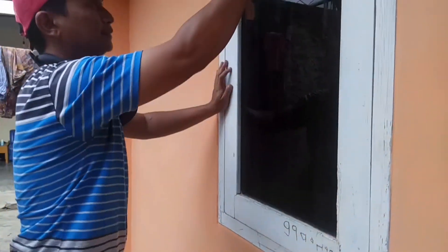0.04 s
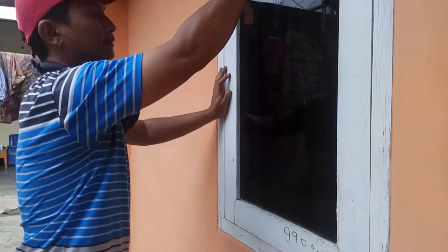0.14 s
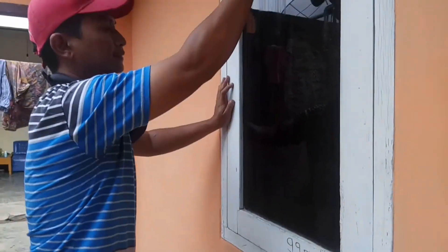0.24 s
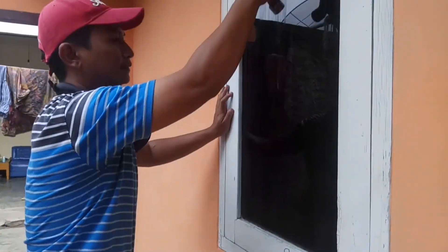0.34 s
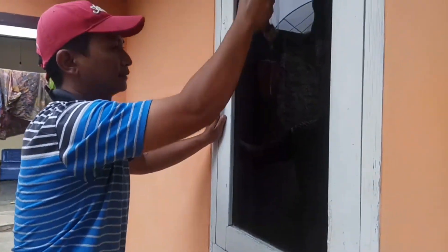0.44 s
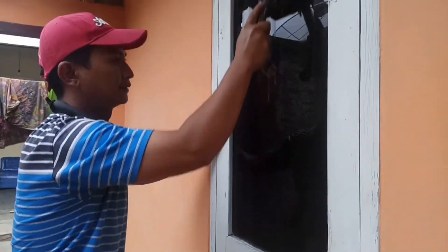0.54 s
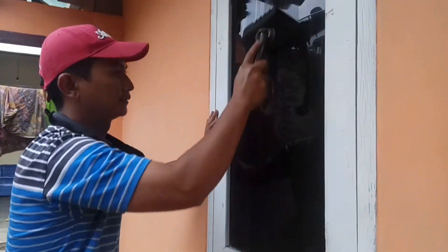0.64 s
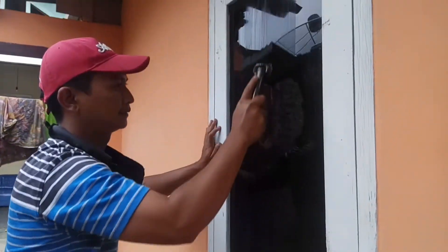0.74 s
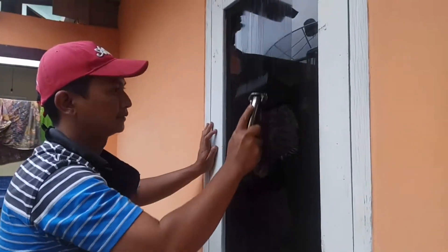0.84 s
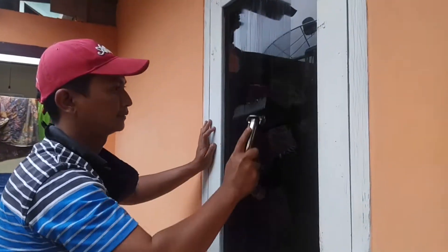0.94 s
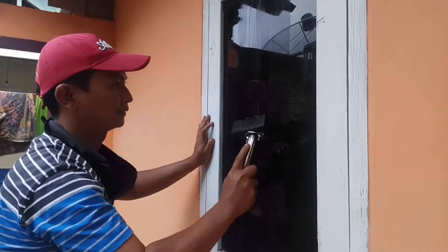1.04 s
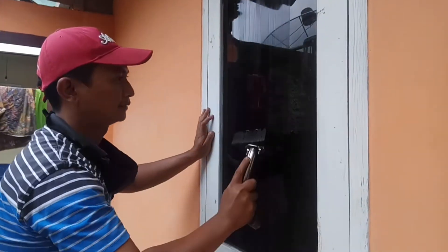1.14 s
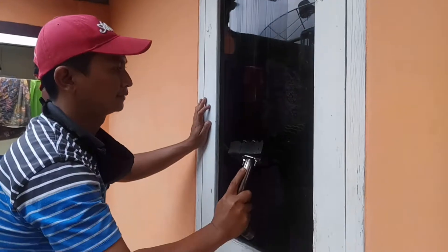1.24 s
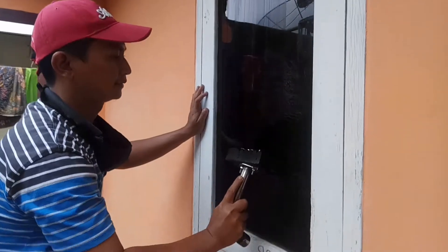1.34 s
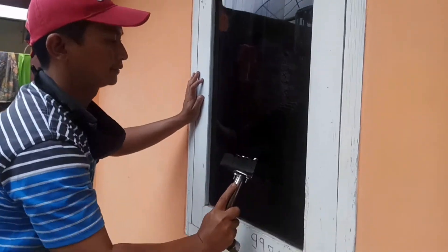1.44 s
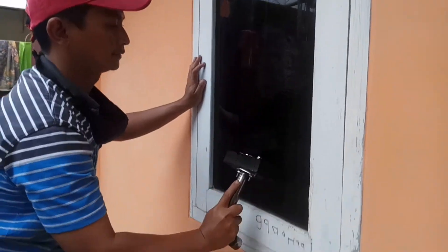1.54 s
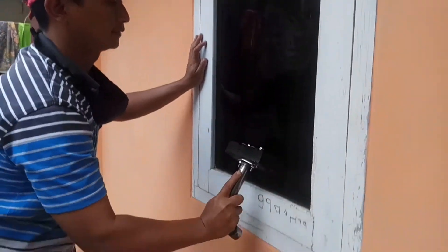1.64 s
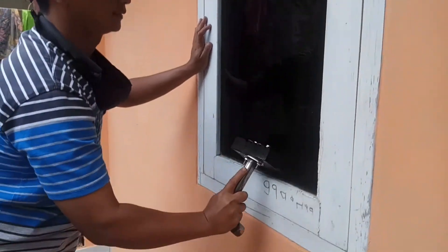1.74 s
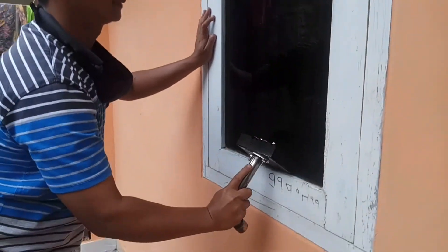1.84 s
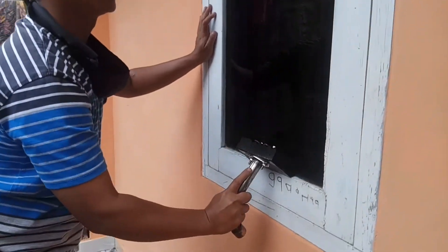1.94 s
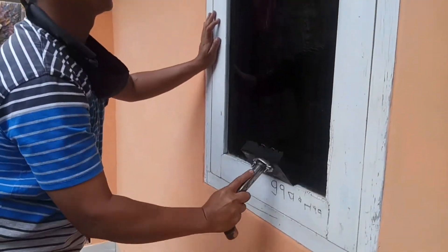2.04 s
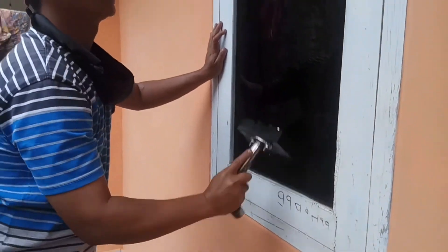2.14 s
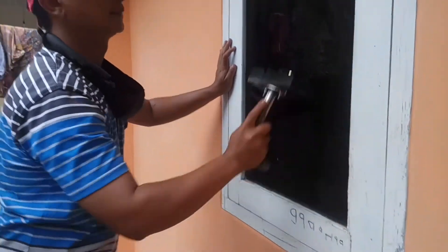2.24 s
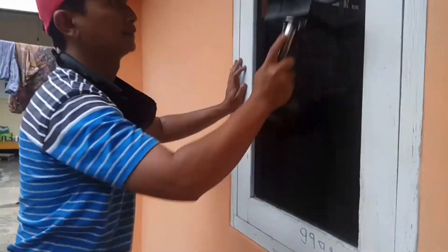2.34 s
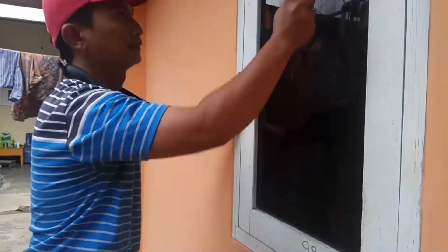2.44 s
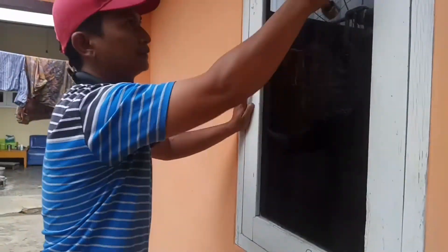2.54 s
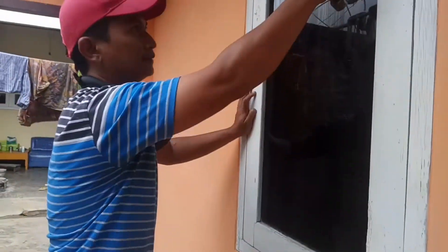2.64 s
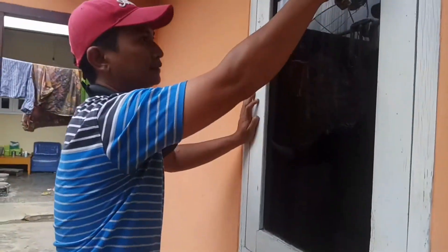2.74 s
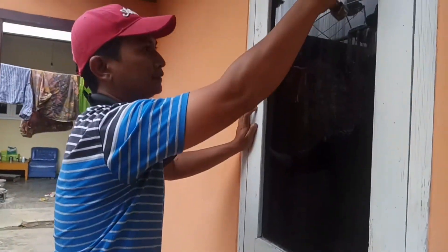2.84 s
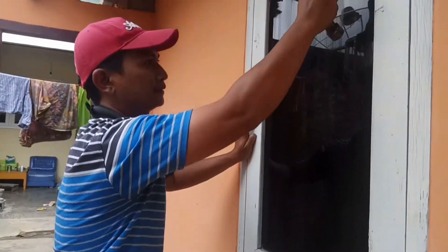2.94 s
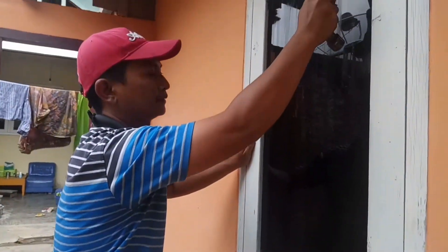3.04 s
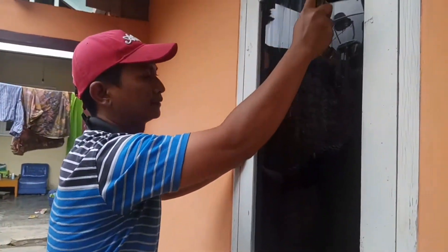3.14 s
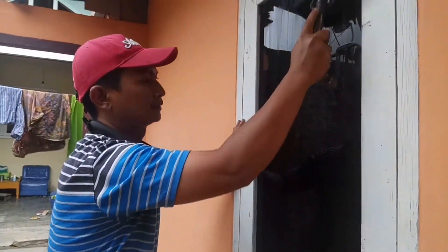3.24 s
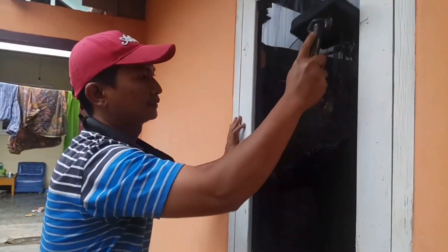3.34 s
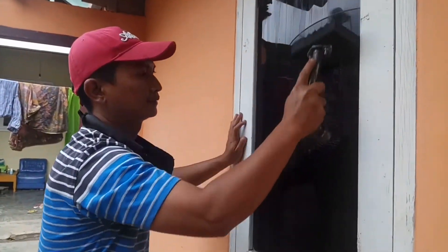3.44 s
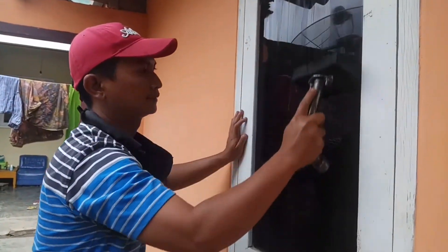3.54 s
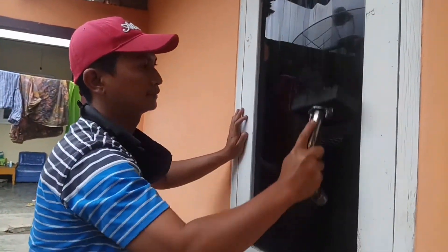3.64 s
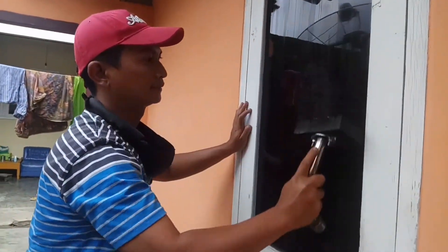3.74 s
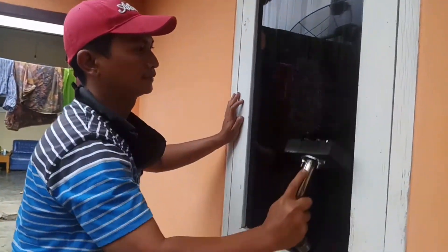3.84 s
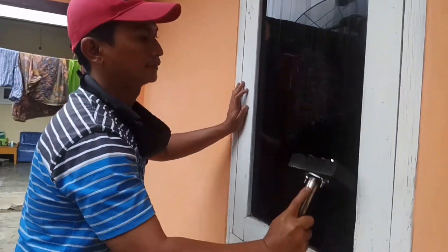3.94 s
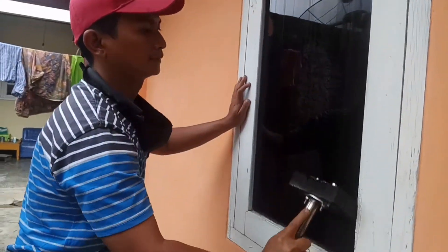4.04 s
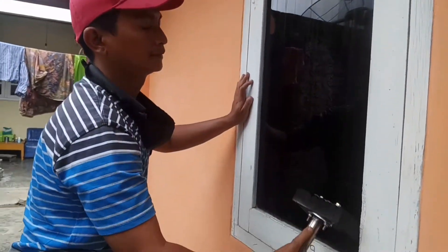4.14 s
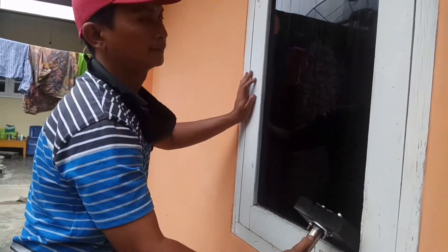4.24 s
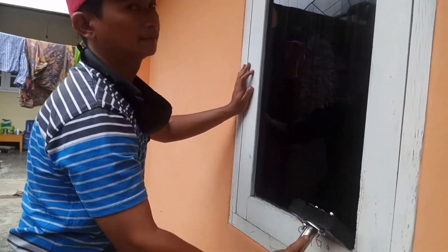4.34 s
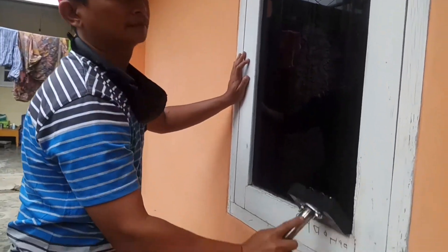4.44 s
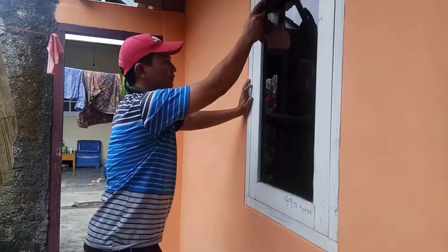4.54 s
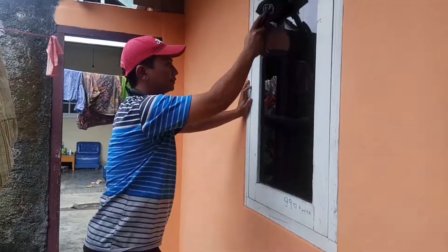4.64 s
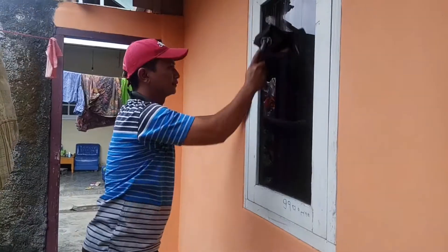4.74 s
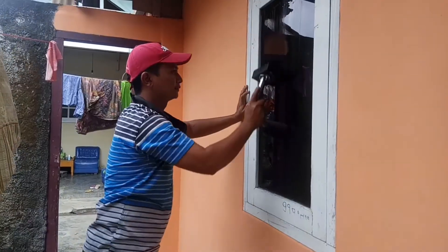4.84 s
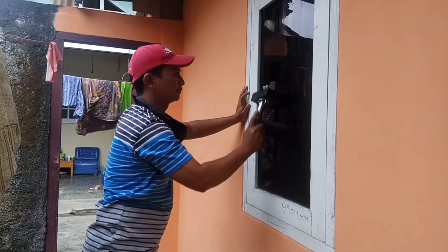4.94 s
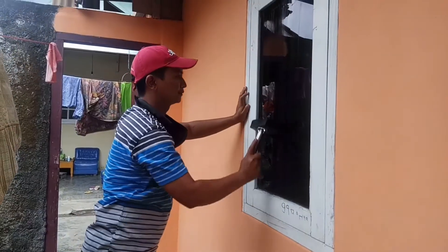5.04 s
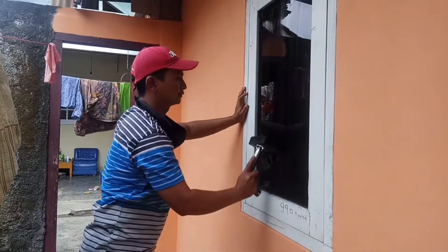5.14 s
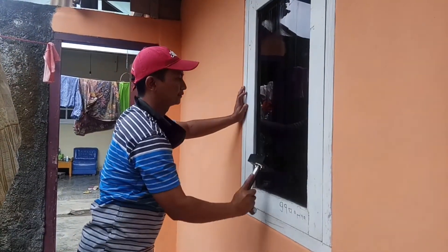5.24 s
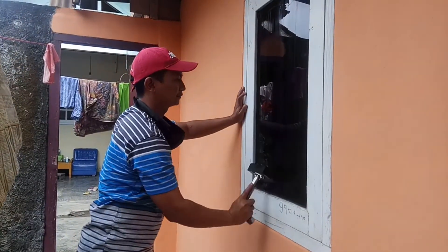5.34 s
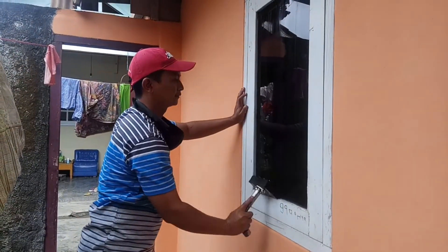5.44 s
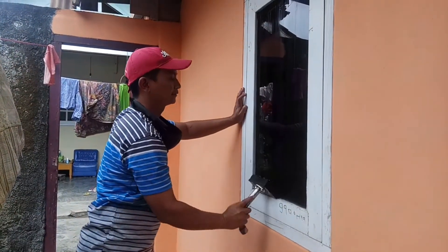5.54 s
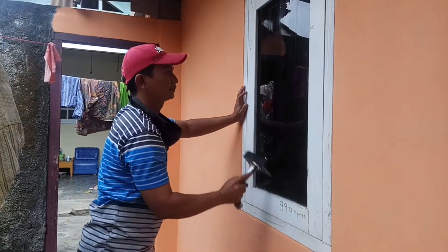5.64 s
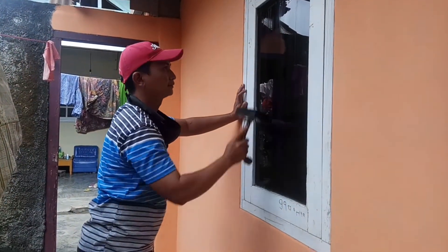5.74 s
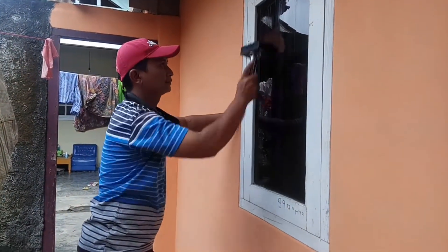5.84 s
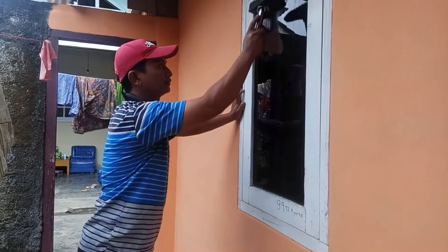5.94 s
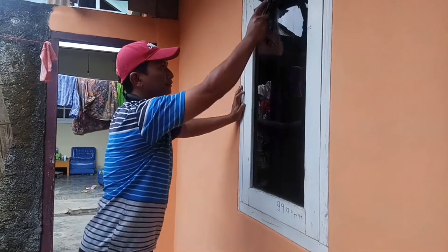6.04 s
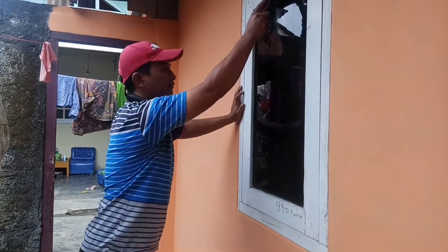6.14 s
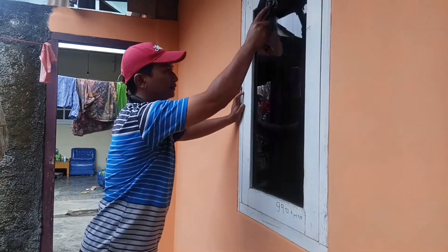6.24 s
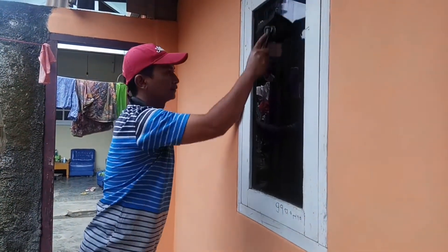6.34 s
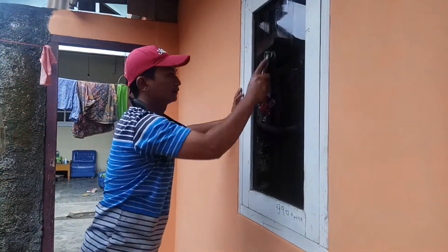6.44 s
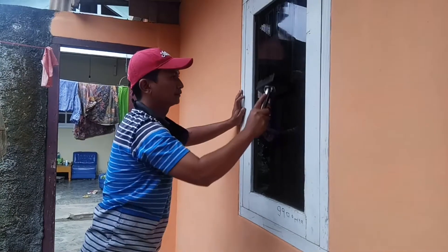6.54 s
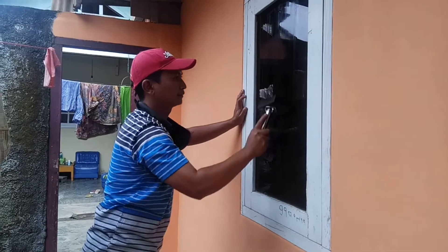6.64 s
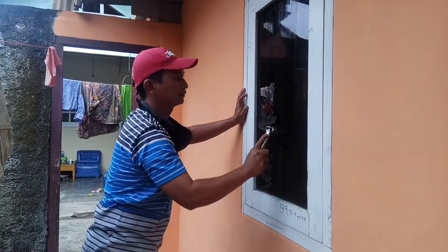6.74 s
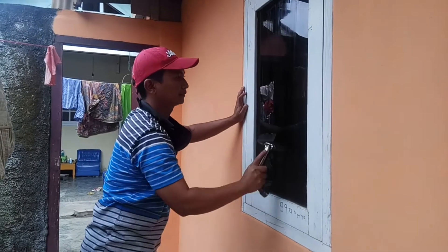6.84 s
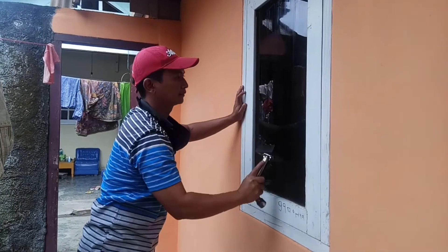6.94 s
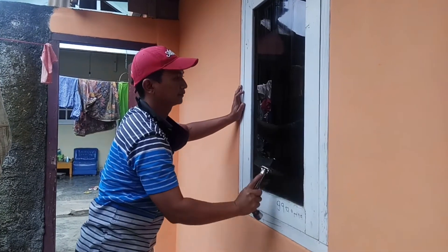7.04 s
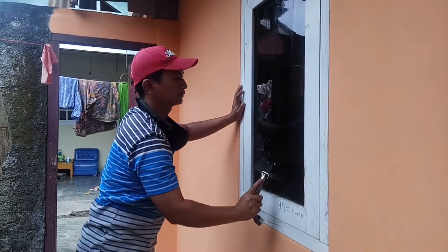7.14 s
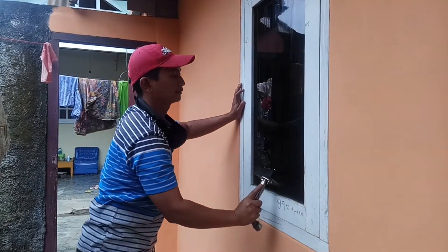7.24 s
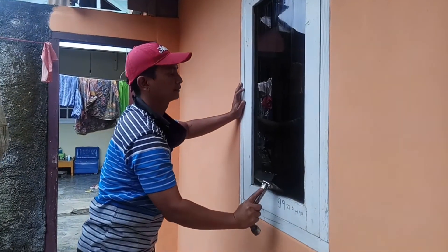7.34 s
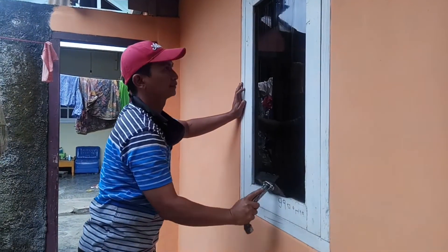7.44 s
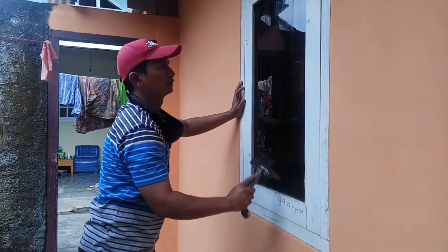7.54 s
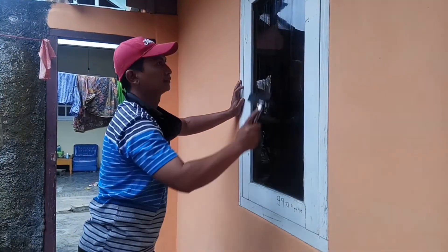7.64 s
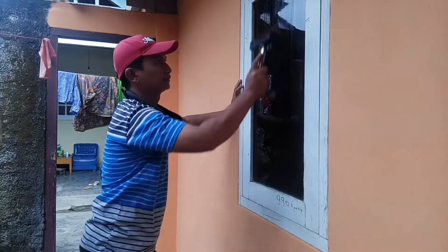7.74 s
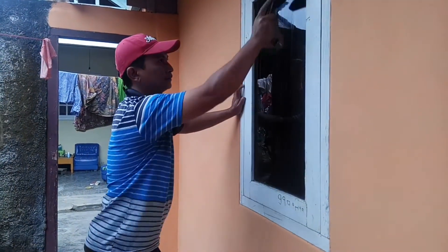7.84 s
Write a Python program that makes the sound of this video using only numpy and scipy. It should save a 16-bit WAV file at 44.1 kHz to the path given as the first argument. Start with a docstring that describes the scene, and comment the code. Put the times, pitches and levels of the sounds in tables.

```python
"""A rubber wiper is pulled four times down a window pane on a porch, close to a pair of microphones.
The blade hisses and scrapes (shaped noise); where it grips, it sticks and slips in a hooting squeak (a near
sine with overtones), its slips rasp and its edge squeals thinly. Around the pulls the tool dabs, ticks and
bumps the pane, clatters on the wooden frame (short noises, decaying tones) and makes both boom (low noise).
Farther off lie a low outdoor rumble, thin air and a faint trill; a gust of wind dies away at the start."""
import sys
import numpy as np
from scipy import signal
from scipy.fft import rfft, irfft
from scipy.io import wavfile

SR = 44100
rng = np.random.default_rng(int(sys.argv[2]) if len(sys.argv) > 2 else 0)


def inscribe(sig):
    """Save sig as 16-bit PCM at rate SR to the path in sys.argv[1].

    A 1-D sig is mono; a 2-D sig holds one channel per row.
    Samples are clipped to [-1, 1] before scaling.
    """
    pcm = np.round(np.clip(np.atleast_2d(sig).T, -1, 1) * 32767)
    wavfile.write(sys.argv[1], SR, pcm.astype(np.int16))


N = 347928
TIME = np.arange(N) / SR  # s

# All table levels are relative: the layers add their own gains.
# Likeness of the two microphones: (frequency [Hz], coherence)
MIC_COHERENCE = [(60, .85), (300, .8), (700, .82), (1400, .5), (3000, 0), (15000, 0)]
# Tilt of noise between the microphones: (frequency [Hz], left-right [dB])
MIC_BALANCE = [(60, -0.5), (700, -.5), (2400, 2.5), (4400, -3), (6500, -4.5), (7800, 3.5), (9000, 14.5),
               (12000, 18.5), (15000, 6)]

# Low swells, mostly around the ends of pulls: the pane and frame boom as the tool reaches them:
# (time [s], length [s], deep level [dB], low-middle level [dB])
PANE_AND_FRAME_BOOMS = [(0.55, 0.24, -46.5, -48), (1.0, 0.43, -57.5, -54.5), (2.02, 0.31, -40, -42),
                        (2.353, 1, -53, -81), (3.038, 0.58, -40.5, -52.5), (3.955, 0.27, -48, -48),
                        (4.277, 0.41, -43, -42), (4.524, 0.16, -40, -49), (5.242, 0.071, -69, -47),
                        (5.647, 0.47, -40.5, -49.5), (5.992, 0.23, -43.5, -55), (6.878, 0.28, -51.5, -45),
                        (7.114, 0.17, -43.5, -56), (7.612, 0.12, -66, -54), (7.89, 0.27, -50, -46.5)]
# Spectrum of the deep part of rumble and booms: (frequency [Hz], level [dB])
DEEP_SPECTRUM = [(12, -40), (20, -14.5), (32, -14), (53, -11.5), (74, -3.5), (91, 4), (153, -4), (178, -9),
                 (220, -19.5), (290, -52), (480, -120)]
# Spectrum of the low middle of rumble and booms: (frequency [Hz], level [dB])
LOW_MIDDLE_SPECTRUM = [(100, -18.5), (190, 1.5), (270, -2), (370, -2), (500, -12), (700, -22),
                       (1100, -25.5), (2500, -57.5)]
# Spectrum of the thin air outdoors: (frequency [Hz], level [dB])
AIR_SPECTRUM = [(700, -2.5), (1200, -14.5), (2000, -19), (2400, -8), (3200, -16), (5400, -14.5), (6400, -1),
                (7600, -22.5), (15000, -35.5)]
# A faint, far trill: (time [s], length [s], pitch [Hz], level [dB], left-right [dB])
FAR_TRILLS = [(0.1, .14, 4550, -67.5, -5), (6.05, 0.42, 2400, -69.5, 31), (7.77, 0.2, 2470, -59.5, 15)]

# Pulls down the pane: (start [s], end [s], rise [s], hiss level [dB], hiss sag [dB/s], scrape level [dB])
PULLS = [(0.36, 1.86, 0.076, -51, 7, -57.5), (3.07, 4.283, 0.19, -46, 6, -53.5),
         (4.68, 5.63, 0.2, -42.5, 20.5, -54), (6.26, 7.54, 0.1, -43, 19, -54)]
# Brushes of the blade as it lands, catches or leaves:
# (time [s], length [s], hiss level [dB], scrape level [dB])
BLADE_SCUFFS = [(0.233, 0.089, -77, -66.5), (0.32, 0.078, -61.5, -85), (1.44, 0.15, -55, -72),
                (1.788, 0.24, -56, -54), (2.006, 0.12, -56, -58), (2.18, 0.22, -70, -90.5),
                (4.405, 0.097, -59, -59.5), (4.56, 0.1, -68, -62.5), (5.566, 0.058, -64, -64),
                (5.703, 0.052, -67.5, -86), (6.009, 0.37, -84, -69.5), (6.194, 0.16, -81, -70),
                (7.614, 0.19, -114, -81)]
# Spectrum of the hiss in the first two pulls: (frequency [Hz], level [dB])
EARLY_HISS_SPECTRUM = [(880, -52), (1500, -4.5), (1590, -13), (1860, 0.5), (2110, -18), (2380, -12),
                       (3220, -5.5), (5740, 3.5), (6210, 2), (8250, -13), (10300, -7.5), (13500, -17.5),
                       (14900, -4), (15600, -9)]
# Spectrum of the hiss in the last two pulls: (frequency [Hz], level [dB])
LATE_HISS_SPECTRUM = [(880, -59.5), (1500, -30), (1620, -8), (2330, -1.5), (3280, -8.5), (3800, 0.5),
                      (5260, 2.5), (6150, 4.5), (8090, -7), (10000, -3), (11600, -10.5), (13600, -10.5),
                      (14900, -1), (15600, -5)]
# Spectrum of the scrape on the pane: (frequency [Hz], level [dB])
SCRAPE_SPECTRUM = [(300, -11.5), (600, 2.5), (1200, -0.5), (1500, -5), (1900, -5.5), (2500, -5.5),
                   (3100, -7.5), (4000, -11), (9000, -42.5)]

# Soft bumps on the pane, the frame or one side of the microphone's housing:
# (time [s], level [dB], pitch [Hz], 60 dB decay [s], left-right [dB])
SOFT_BUMPS = [(0.178, -17.5, 176, 0.022, -18), (1.924, -21.5, 86.5, 0.078, 0),
              (2.644, -26, 263, 0.02, -12.5), (2.66, -9.5, 125.6, 0.035, -29), (2.957, -19, 100, 0.074, -2),
              (4.21, -26, 103, 0.19, -1), (4.243, -33.5, 166, 0.032, -2), (4.418, -24, 134, 0.14, 3),
              (5.574, -26, 192, 0.15, -1.5)]
# Light ticks of the blade touching down: (time [s], level [dB], ring [Hz])
BLADE_TICKS = [(0.187, -49, 806), (0.294, -43.5, 5600), (2.555, -45, 9100), (2.972, -39.5, 4460),
               (3.723, -37.5, 1010), (5.865, -50.5, 11600), (5.93, -51.5, 5910), (6.2, -56, 10000),
               (7.185, -68, 12000), (7.742, -61, 5800)]
# The blade shivers without full grip: (time [s], length [s], pitch [Hz], level [dB])
BLADE_SHIVERS = [(0.537, 0.42, 765, -50), (1.863, 0.1, 770, -44), (3.298, 0.31, 758, -46.5),
                 (3.55, 0.27, 768, -37.5), (3.88, 0.21, 766, -47), (4.823, 0.19, 772, -51.5),
                 (5.241, 0.067, 776, -38), (6.4, 0.14, 775, -48.5), (6.765, 0.08, 753, -29),
                 (6.86, 0.13, 755.4, -39), (6.972, 0.19, 750, -50.5)]

# Path of the long squeak in the first pull: (time [s], pitch [Hz], level [dB], left-right [dB])
LONG_SQUEAK_PATH = [(0.66, 750, -52, 11.5), (0.702, 770, -20, -2.5), (0.726, 760, -13, 0),
                    (0.844, 760.6, -9.5, 0.5), (0.888, 767, -14.5, -1), (0.944, 760.3, -9.5, 0.0),
                    (1.024, 755.8, -9.5, -4), (1.096, 751.5, -13, -8), (1.226, 756, -8, 1),
                    (1.346, 761, -11, -1.0), (1.422, 765.7, -22.5, -7.5), (1.474, 761.5, -10.5, -0.5),
                    (1.61, 767.8, -12, -5.5), (1.68, 758.3, -15.5, -3), (1.77, 768, -17.5, -6.5),
                    (1.8, 775, -22.5, 0), (1.85, 773, -55, 6)]
# Paths of the later short squeaks, one list each: (time [s], pitch [Hz], level [dB], left-right [dB])
SHORT_SQUEAK_PATHS = [
    [(4.965, 763, -43, 0), (4.991, 771, -40, -6.5), (5.049, 770.5, -20, -4), (5.071, 772, -17.5, -11),
     (5.095, 770, -26.5, -21), (5.149, 775, -35, 7), (5.195, 782, -50, 5.5)],
    [(6.43, 772.7, -54.5, -2.5), (6.508, 771.6, -14, -0.5), (6.57, 777, -12.5, 1), (6.632, 772, -15.5, -1),
     (6.668, 767, -10.5, 1.5), (6.714, 762, -12, 1), (6.745, 768.0, -30.5, 4.5)],
]
# Overtones from the second harmonic up: (level in a smooth squeak [dB], level in a bite [dB])
SQUEAK_OVERTONES = [(-26.5, -3), (-41.5, 1), (-59.5, -12), (-43.5, -5), (-54.5, -7.5), (-57, -7),
                    (-63, -12.5), (-70, -26), (-81, -33.5), (-84.5, -39.5)]
# The rubber bites harder and its slips sharpen:
# (time [s], length [s], level at the third harmonic [dB], tilt from there [dB/harmonic])
RUBBER_BITES = [(0.966, 0.087, -44, -1), (1.059, 0.13, -35.5, 0), (1.158, 0.12, -43.5, 0.9),
                (1.247, 0.1, -36.5, 0.6), (1.344, 0.12, -37, 0.24), (1.443, 0.16, -34, -0.3),
                (1.543, 0.14, -45.5, 0.5), (6.559, 0.083, -42.5, -5.5), (6.695, 0.093, -39, -2.5)]
# The slips turn ragged and rasp: (time [s], length [s], level [dB])
RAGGED_SLIPS = [(1.424, 0.077, -61.5), (5.046, 0.18, -52), (6.52, 0.21, -42.5), (6.684, 0.11, -39.5)]
# Spectrum of the rasp: (frequency [Hz], level [dB])
RASP_SPECTRUM = [(2500, -30.5), (4500, -34), (5400, 8.5), (6300, 13.5), (7800, -4.5), (9500, 6),
                 (11500, -8), (13500, -31.5), (15500, -12)]

# The tool clatters on the frame: (time [s], length [s], level [dB])
FRAME_CLATTERS = [(2.027, 0.059, -41.5), (2.993, 0.057, -35), (4.43, 0.043, -41.5), (5.585, 0.047, -35)]
# Spectrum of the wooden frame: (frequency [Hz], level [dB])
FRAME_SPECTRUM = [(100, -28), (200, -8), (400, 9.5), (700, 0.5), (1400, -9.5), (2800, -9.5), (5000, -22.5),
                  (9000, -65)]
# The blade is set on the pane with quick, dry dabs: (time [s], length [s], level [dB])
BLADE_DABS = [(2.58, 0.085, -54), (2.675, 0.083, -53), (2.755, 0.14, -49), (2.85, 0.064, -55.5),
              (2.92, 0.11, -51), (2.985, 0.04, -54), (5.87, 0.03, -59)]
# Spectrum of a dab: (frequency [Hz], level [dB])
DAB_SPECTRUM = [(530, -35), (900, -3), (1130, -11.5), (1450, -4), (1950, -11.5), (6350, -4.5),
                (7960, -15.5), (10200, -11.5), (13400, -17), (15500, -2.5)]
# Thin squeals of the rubber edge: (time [s], length [s], pitch [Hz], level [dB], left-right [dB])
EDGE_SQUEALS = [(3.738, 0.049, 8980, -35, 15), (3.757, 0.02, 8850, -32, 16), (3.797, 0.055, 8980, -38, 16),
                (3.835, 0.033, 8690, -30.5, 16), (3.86, 0.024, 8710, -32, 18), (3.89, 0.037, 8830, -41, 19),
                (3.929, 0.054, 8530, -36.5, 16), (3.957, 0.036, 8800, -39.5, 13),
                (5.03, 0.35, 6150, -46.5, -5), (5.11, 0.1, 6190, -44, -10), (6.37, 0.14, 6350, -36.5, 2.5),
                (6.378, 0.028, 6450, -27.5, -23), (6.488, 0.042, 6230, -24, -9),
                (6.54, 0.095, 6250, -37, -13), (6.71, 0.079, 6060, -25.5, -23),
                (6.76, 0.062, 6040, -33, -3)]

WIND_DB, WIND_FALL_DB_PER_S, CALM_DB = -28, 23.5, -63  # the gust, its fall and the faint rest
DEEP_DB, LOW_MIDDLE_DB, AIR_DB = -44, -52.5, -66  # resting levels of rumble and air
DRIFT_DB, THROB_DB, GUST_DB, CLATTER_GRAIN_DB = 0.3, 1.3, 2.5, 4.5  # unevenness of lows, wind, clatter
IDLE_HISS_DB, IDLE_SCRAPE_DB = -78, -80  # what remains between pulls
RELEASE_S, SCRAPE_SAG_DB_PER_S = 0.044, 8.5  # lift-off time constant; the scrape eases along a pull
GRIP_HUSH_DB, GRIP_SETTLE_S = -14.5, 0.88  # hiss change per unit of squeak amplitude; its lag
LATE_PULLS_S = 4.6  # the late hiss spectrum takes over
SHIVER_WIDTH_HZ = 32  # how loosely the resonance holds its pitch
JITTER, TREMOR_DB = .0016, .35  # unsteadiness of the squeak: fraction of pitch, strength
OVERTONE_FLUTTER_DB, FLUTTER_PER_S = 2.5, 20  # each overtone flutters on its own
EDGE_HZ = 15700  # upper band limit


def amp(db):
    """Turns decibels into gain."""
    return 10 ** (np.asarray(db) / 20)


def unit(x):
    """Scales to rms 1."""
    return x / np.sqrt(np.mean(x ** 2) + 1e-20)


def read(points, hz):
    """Reads a spectrum on a log-frequency axis."""
    f, value = np.transpose(points)
    return np.interp(np.log(hz + 1), np.log(f + 1), value)


def pan(db):
    """Left and right gains with a mean of 1."""
    sides = amp(np.array([[.5], [-.5]]) * db)
    return sides / sides.mean(0)


def wander(rate):
    """Smooth random motion of rms 1, up to about rate changes a second."""
    hz = np.fft.rfftfreq(N, 1 / SR)
    smoothing = np.exp(-(hz / rate) ** 2)
    return unit(irfft(rfft(rng.standard_normal(N)) * smoothing, N))


def bell(s, length):
    """A smooth rise and fall centred on s."""
    return np.exp(-np.minimum((2 * (TIME - s) / length) ** 2 * 2, 100))


def bells(rows):
    """Sums smooth bells from rows of (time [s], length [s], level [dB])."""
    return sum(amp(db) * bell(s, length) for s, length, db in rows)


def add(mix, s, sound):
    """Mixes a sound in at time s."""
    start = max(round(s * SR), 0)
    part = mix[..., start:][..., :sound.shape[-1]]
    part += sound[..., :part.shape[-1]]


def noise(spectrum, grain_db=0):
    """Coloured, grainy noise at two microphones: alike in the lows, the right one dull in the top treble."""
    hz = np.fft.rfftfreq(N, 1 / SR)
    grains = amp(grain_db * np.minimum(rng.exponential(1, N), 6))
    a, b = rfft(rng.standard_normal((2, N)) * grains)
    same = np.clip(read(MIC_COHERENCE, hz), -1, 1)
    right = same * a + np.sqrt(1 - same ** 2) * b
    pair = np.array([a, right]) * pan(read(MIC_BALANCE, hz))
    pair = irfft(pair * amp(read(spectrum, hz)), N)
    return pair / pair.mean(0).std()


def fuzzy_tone(hz, width_hz):
    """Noise in a narrow resonance, rms about 1."""
    phase = 2 * np.pi * hz * TIME
    return wander(width_hz) * np.cos(phase) + wander(width_hz) * np.sin(phase)


def porch(x, t60, wet_db):
    """Adds dense, decaying reflections from the near walls, different at each microphone."""
    t = TIME[:SR // 2]
    hits = rng.standard_normal((2, len(t))) * (rng.random((2, len(t))) < .05)
    taps = hits * (t > .003) * amp(-60 * t / t60)
    taps /= np.linalg.norm(taps, axis=1, keepdims=True)
    return x + amp(wet_db) * signal.fftconvolve(np.atleast_2d(x), taps, axes=1)[:, :N]


def whistles(rows, jitter, flutter_db):
    """Short high tones, unsteady in pitch and strength, with the porch around them."""
    out = np.zeros((2, N))
    drift = np.cumsum(1 + jitter * wander(384)) / SR  # unsteady time, s
    flutter = amp(flutter_db * wander(220))
    for s, length, hz, db, side_db in rows:
        near = abs(TIME - s) < length * 2
        level = amp(db) * (bell(s, length) * flutter)[near]
        out[:, near] += pan(side_db) * level * np.sin(2 * np.pi * hz * drift[near])
    return porch(out, t60=0.47, wet_db=-9.5)


def wind():
    """Low, lumpy buffeting on the microphones, unrelated at the two, falling to a faint rest."""
    buffets = np.array([fuzzy_tone(hz=96.2, width_hz=76) * amp(GUST_DB * wander(17)) for _ in range(2)])
    return buffets * amp(np.maximum(WIND_DB - WIND_FALL_DB_PER_S * TIME, CALM_DB))


def rumble_and_booms():
    """A throbbing low rumble, with booms of the pane and frame shaped from the same low noise."""
    deep_level = amp(DEEP_DB) + bells((s, length, db) for s, length, db, _ in PANE_AND_FRAME_BOOMS)
    middle_level = amp(LOW_MIDDLE_DB) + bells((s, length, db) for s, length, _, db in PANE_AND_FRAME_BOOMS)
    hum = fuzzy_tone(hz=89.5, width_hz=30)
    deep = amp(-2.0) * noise(DEEP_SPECTRUM) + amp(-3) * hum
    deep = deep * deep_level * amp(THROB_DB * wander(11))
    middle = noise(LOW_MIDDLE_SPECTRUM) * middle_level * amp(0.54 * wander(25))
    return (deep + middle) * amp(DRIFT_DB * wander(2.4))


def air_and_trill():
    """Steady, thin noise of the air outdoors, and a far trill of unsteady high tones."""
    return amp(AIR_DB) * noise(AIR_SPECTRUM) + whistles(FAR_TRILLS, jitter=0.043, flutter_db=4.0)


def grip():
    """Pitch, amplitude and left-right dB of the squeak; amplitude is zero while the blade slides freely."""
    squeaks = [LONG_SQUEAK_PATH] + SHORT_SQUEAK_PATHS
    s, hz, db, side_db = np.concatenate(squeaks).T
    gate = 0
    for path in squeaks:
        inside = np.minimum(TIME - path[0][0], path[-1][0] - TIME)
        gate = gate + np.clip(inside / 0.0057, 0, 1)
    return np.interp(TIME, s, hz), gate * amp(np.interp(TIME, s, db)), np.interp(TIME, s, side_db)


def strokes():
    """Levels of hiss and scrape: each pull rises, eases on the way down and lifts off; grip hushes the hiss."""
    hiss, scrape = np.full(N, amp(IDLE_HISS_DB)), np.full(N, amp(IDLE_SCRAPE_DB))
    for start, end, rise, hiss_db, sag, scrape_db in PULLS:
        t = np.maximum(TIME - start, 0)
        lift_off = np.exp(-np.maximum(TIME - end, 0) / RELEASE_S)
        contact = (1 - np.exp(-(t / rise) ** 1.4)) * lift_off
        hiss += contact * amp(hiss_db - sag * t)
        scrape += contact * amp(scrape_db - SCRAPE_SAG_DB_PER_S * t)
    step = 1 / (GRIP_SETTLE_S * SR)
    slow_grip = signal.lfilter([step], [1, step - 1], grip()[1])
    hiss *= amp(GRIP_HUSH_DB * slow_grip)
    for s, length, hiss_db, scrape_db in BLADE_SCUFFS:
        touch = bell(s, length)
        hiss += amp(hiss_db) * touch
        scrape += amp(scrape_db) * touch
    return hiss, scrape


def rub():
    """Countless tiny slips, as noise, hiss along the edge and scrape the pane; the pressure flutters."""
    hiss_level, scrape_level = strokes()
    late_hiss = amp(5.0) * noise(LATE_HISS_SPECTRUM, grain_db=0.5)
    early_hiss = amp(7.0) * noise(EARLY_HISS_SPECTRUM)
    hiss = np.where(TIME > LATE_PULLS_S, late_hiss, early_hiss)
    scrape = noise(SCRAPE_SPECTRUM, grain_db=3) * amp(7.0 + 2.3 * wander(30))
    return hiss * hiss_level * amp(1.3 * wander(60)) + scrape * scrape_level


def bumps():
    """Each soft blow swings a panel for a few decaying cycles, with a weak octave."""
    out, t = np.zeros((2, N)), TIME[:SR // 3]
    for s, db, hz, t60, side_db in SOFT_BUMPS:
        swing = np.sin(2 * np.pi * hz * t) + 0.24 * np.sin(2 * np.pi * 2 * hz * t)
        onset = 1 - np.exp(-t / 0.0013)
        add(out, s, pan(side_db) * swing * amp(db - 60 * t / t60) * onset)
    return porch(out, t60=.25, wet_db=-9)


def ticks():
    """Each touch is a short, decaying splash of noise around its ring."""
    out, t = np.zeros((2, N)), TIME[:SR // 4]
    for s, db, hz in BLADE_TICKS:
        band = signal.butter(2, [hz * 0.73, min(hz * 1.18, SR / 2 - 1)], "band", fs=SR)
        splash = unit(signal.lfilter(*band, rng.standard_normal((2, len(t)))))
        add(out, s, splash * amp(db - 60 * t / 0.048))
    return out


def shiver():
    """Friction noise rings the squeak's resonance without fully locking to it."""
    # a steady part plus a random complex part: half locked
    ring = 1 + .7 * (wander(SHIVER_WIDTH_HZ) + 1j * wander(SHIVER_WIDTH_HZ))
    out = np.zeros(N)
    for s, length, hz, db in BLADE_SHIVERS:
        tone = (ring * np.exp(2j * np.pi * hz * TIME)).real
        out += amp(db) * bell(s, length) * tone
    return porch(out, t60=0.42, wet_db=-3)


def squeak():
    """Stick and slip drives the pane: almost a sine, with strong overtones where the rubber bites."""
    hz, strength, side_db = grip()
    phase = 2 * np.pi * np.cumsum(hz * (1 + JITTER * wander(150))) / SR
    # the paths to the two microphones shift: opposite phase leads, rad
    lead = np.array([[1], [-1]]) * (.15 + .15 * wander(4))
    hoot = pan(side_db) * strength * amp(2.2 + TREMOR_DB * wander(30)) * np.sin(phase + lead)
    on, overtones = strength > 0, np.zeros((2, N))
    bites = [(bell(s, length)[on], db, tilt) for s, length, db, tilt in RUBBER_BITES]
    for k, (smooth_db, bite_db) in enumerate(SQUEAK_OVERTONES, 2):
        bite = sum(shape * amp(db + bite_db + tilt * (k - 3)) for shape, db, tilt in bites)
        smooth = strength[on] * amp(smooth_db)
        flutter = amp(OVERTONE_FLUTTER_DB * wander(FLUTTER_PER_S)[on])
        overtones[:, on] += np.hypot(smooth, bite) * flutter * np.sin(k * (phase[on] + lead[:, on]))
    return porch(hoot, t60=.2, wet_db=-27) + porch(np.sqrt(2) * overtones, t60=.25, wet_db=-6)


def rasp():
    """Ragged slips: smeared high harmonics and a puff of treble noise in each cycle."""
    hz = grip()[0]
    turns = np.cumsum(hz) / SR
    puffs = noise(RASP_SPECTRUM) * unit(.4 + np.exp(-(turns % 1) / .4))
    ragged = 2 * np.pi * (turns + .022 * wander(250))
    heard = bells(RAGGED_SLIPS)
    on, buzz = heard > 1e-5, np.zeros((2, N))
    for k in range(5, 17):
        line_hz = k * hz.mean()
        line = np.cos(k * ragged[on] + 2 * np.pi * rng.random())
        buzz[:, on] += pan(read(MIC_BALANCE, line_hz)) * amp(read(RASP_SPECTRUM, line_hz)) * line
    return amp(-1.5) * puffs * heard + porch(amp(-12.0) * buzz * heard, t60=0.068, wet_db=8.5)


def clatter():
    """Bursts of grainy noise, as of small, quick blows into the dull wooden frame."""
    blows = noise(FRAME_SPECTRUM, grain_db=CLATTER_GRAIN_DB)
    return porch(blows * bells(FRAME_CLATTERS), t60=0.29, wet_db=-1.5)


def dabs():
    """Bright, grainy noise: brief brushes of rubber on dry glass."""
    brushes = amp(5.5) * noise(DAB_SPECTRUM, grain_db=2)
    return porch(brushes * bells(BLADE_DABS), t60=0.22, wet_db=-2.5)


def squeals():
    """The rubber edge sings in short, thin, unsteady tones."""
    return whistles(EDGE_SQUEALS, jitter=0.0112, flutter_db=3.5)


def scene():
    """The close wiper, its knocks and booms, and the surroundings."""
    lows_and_surroundings = wind() + rumble_and_booms() + air_and_trill()
    wiper = rub() + shiver() + squeak() + rasp() + dabs() + squeals()
    knocks = bumps() + ticks() + clatter()
    return lows_and_surroundings + wiper + knocks


def record(dry):
    """A soft start and end, and the recorder's upper band limit."""
    faded = dry * signal.windows.tukey(N, .003)
    low_pass = signal.firwin(511, EDGE_HZ, window=("kaiser", 9), fs=SR)
    return signal.oaconvolve(faded, low_pass[None], "same")


dry = scene()
out = record(dry)
inscribe(out)
```